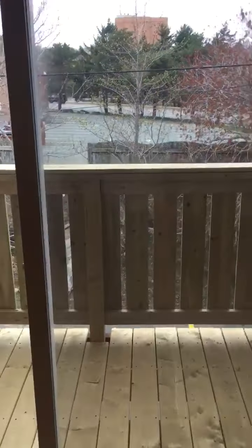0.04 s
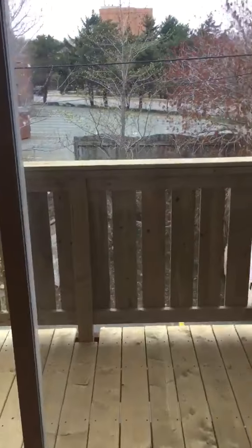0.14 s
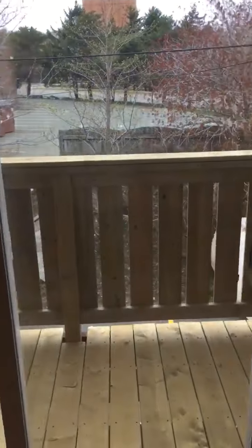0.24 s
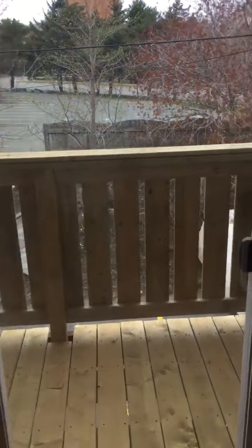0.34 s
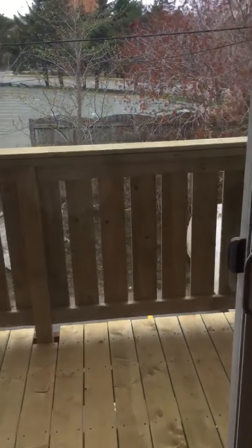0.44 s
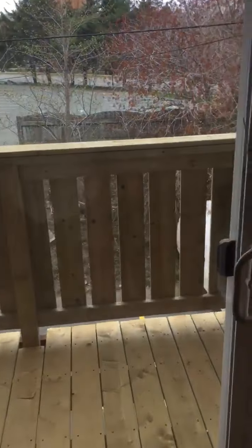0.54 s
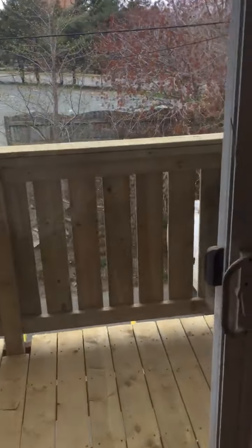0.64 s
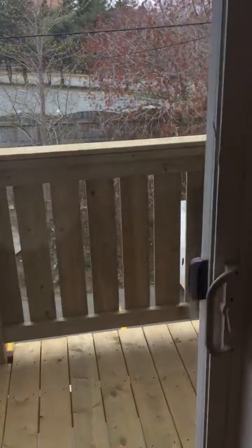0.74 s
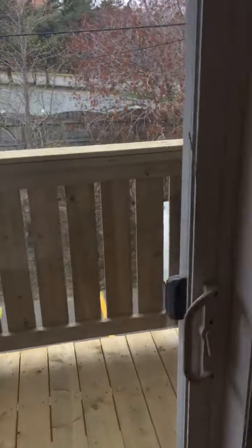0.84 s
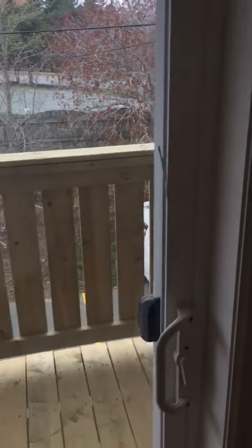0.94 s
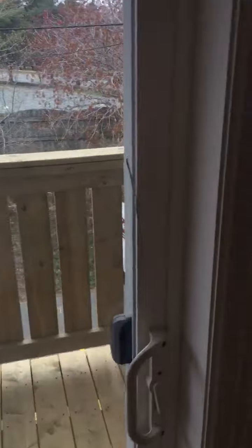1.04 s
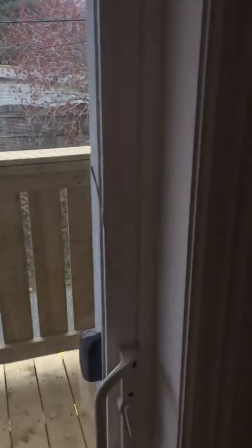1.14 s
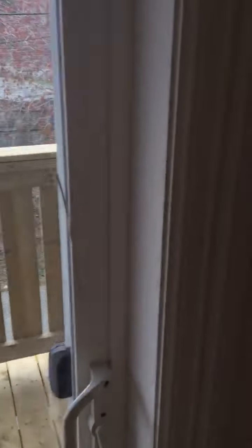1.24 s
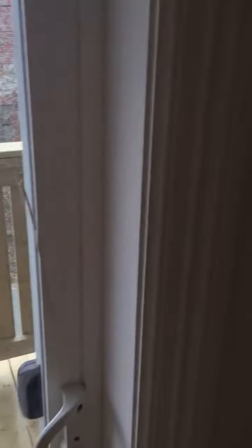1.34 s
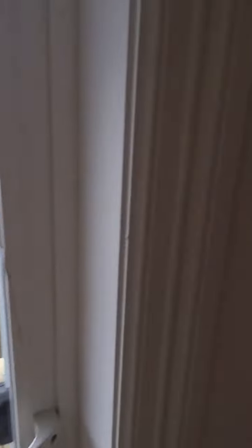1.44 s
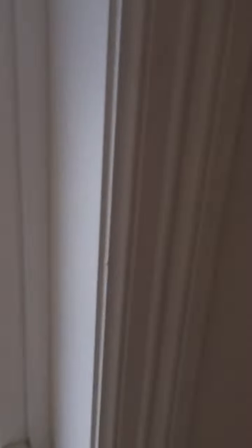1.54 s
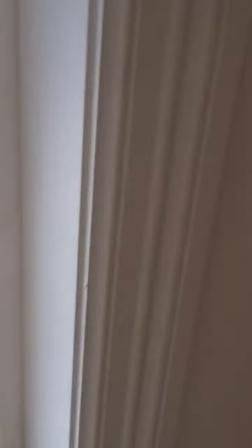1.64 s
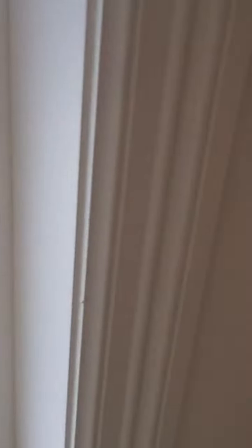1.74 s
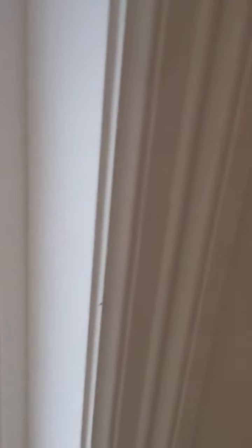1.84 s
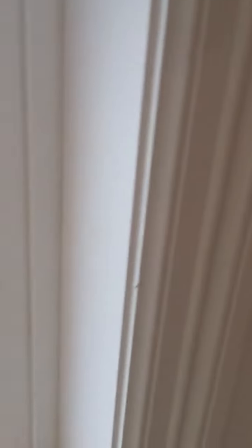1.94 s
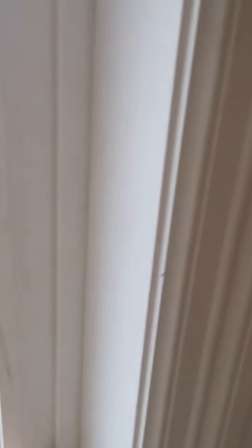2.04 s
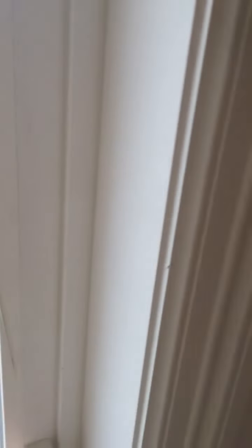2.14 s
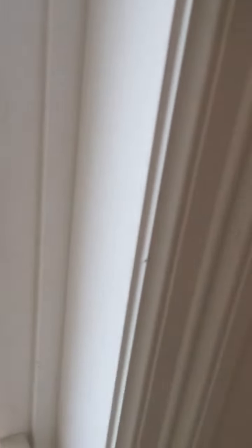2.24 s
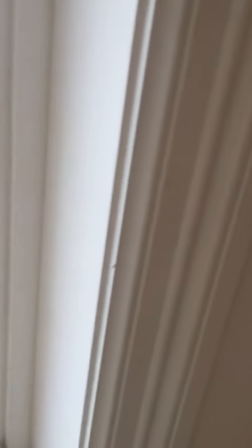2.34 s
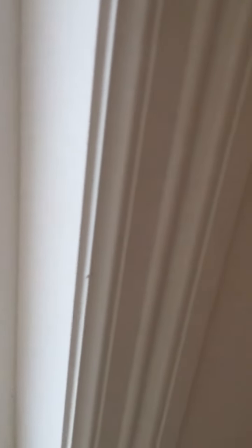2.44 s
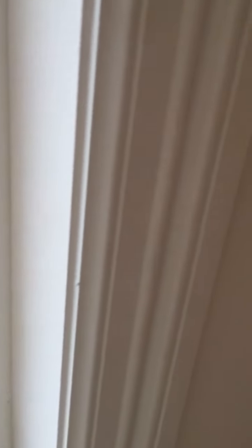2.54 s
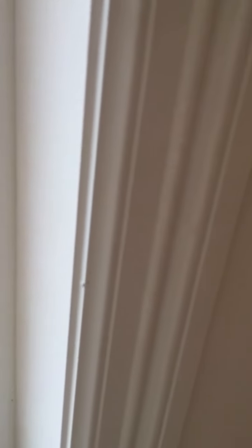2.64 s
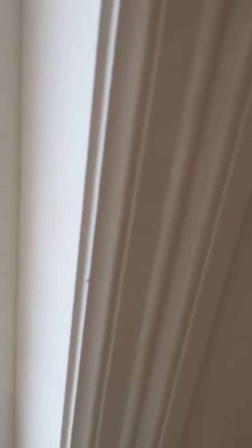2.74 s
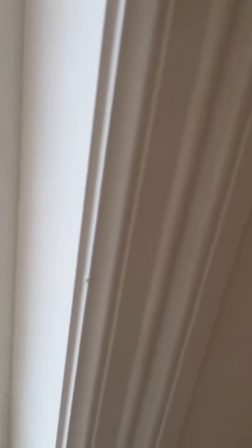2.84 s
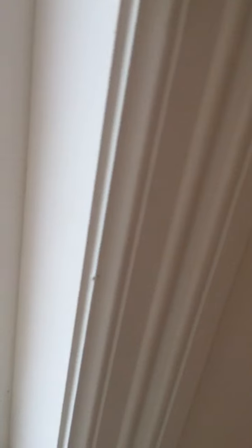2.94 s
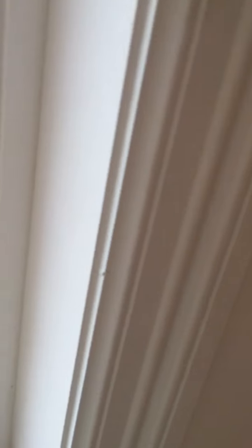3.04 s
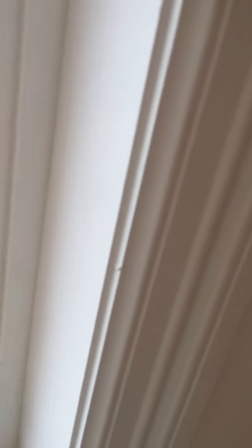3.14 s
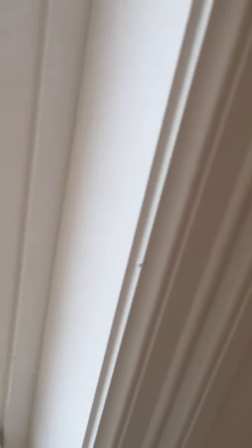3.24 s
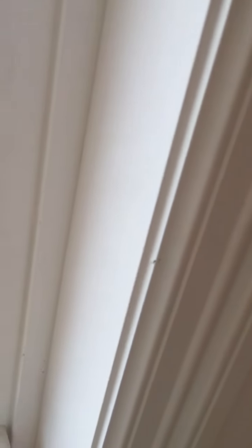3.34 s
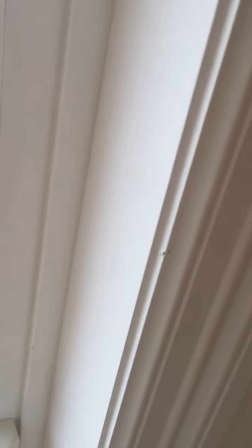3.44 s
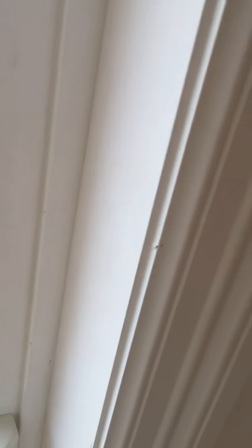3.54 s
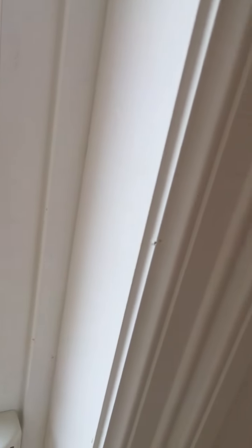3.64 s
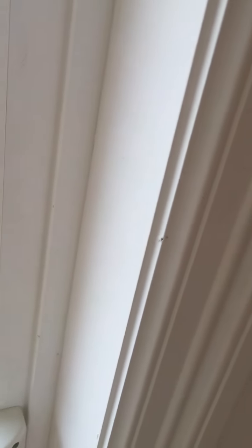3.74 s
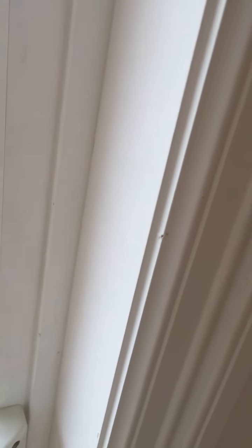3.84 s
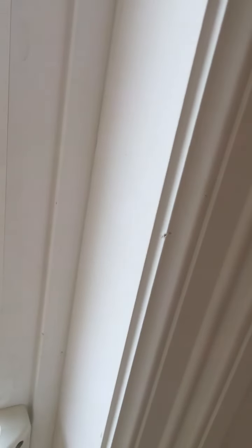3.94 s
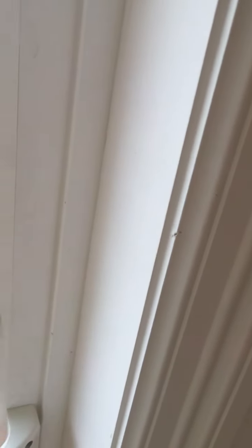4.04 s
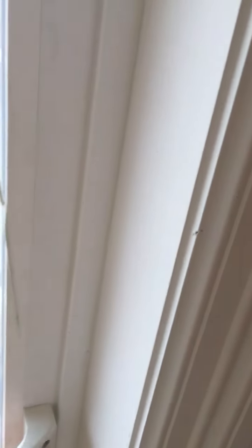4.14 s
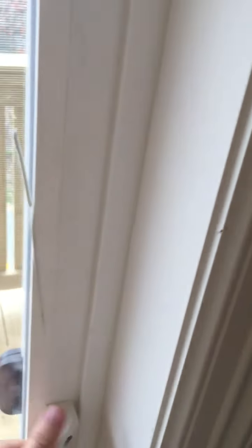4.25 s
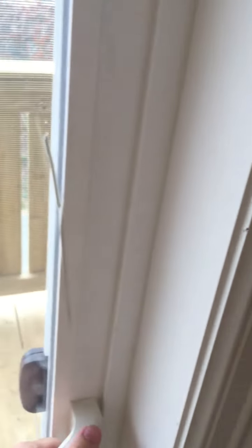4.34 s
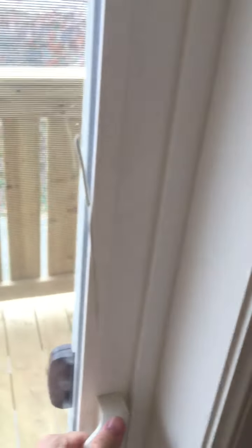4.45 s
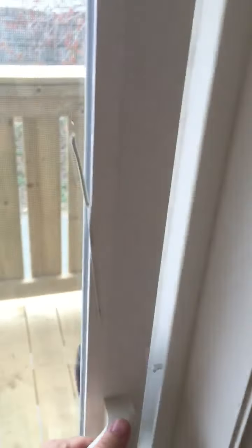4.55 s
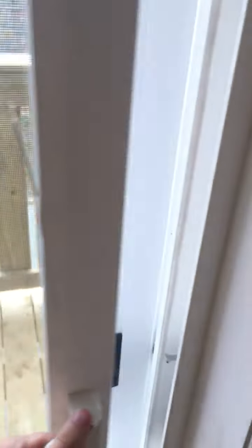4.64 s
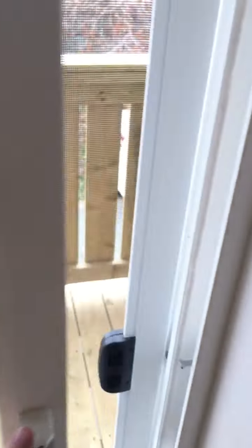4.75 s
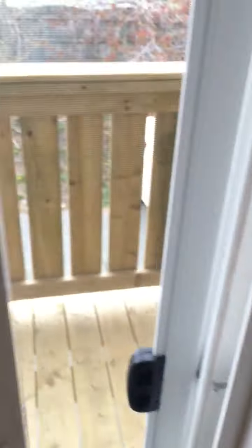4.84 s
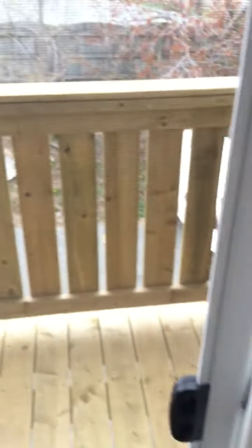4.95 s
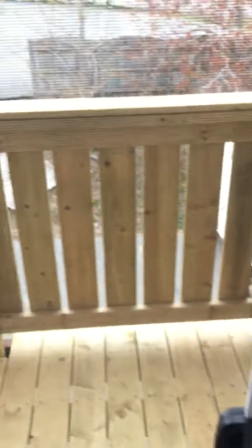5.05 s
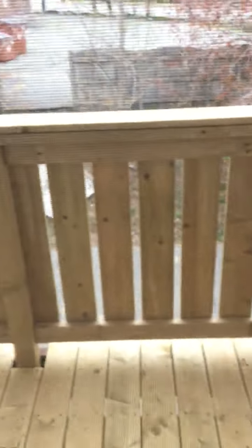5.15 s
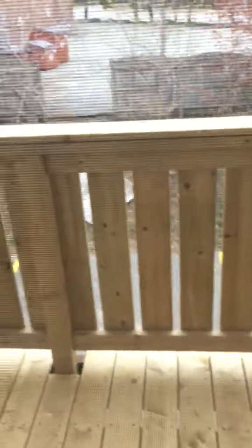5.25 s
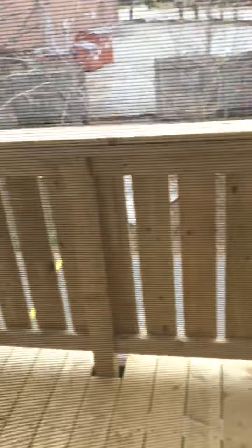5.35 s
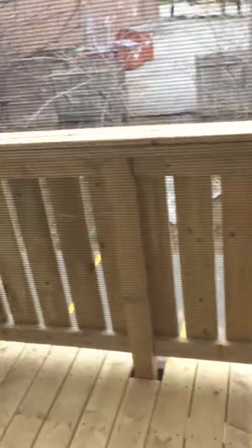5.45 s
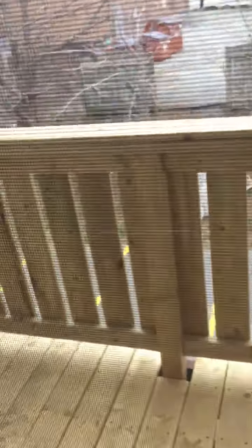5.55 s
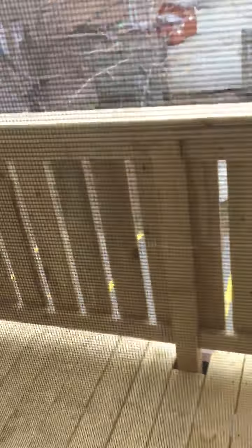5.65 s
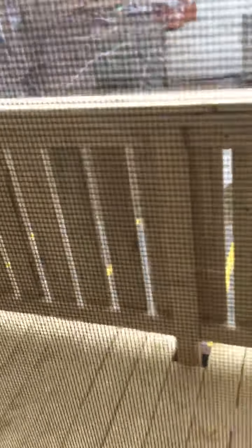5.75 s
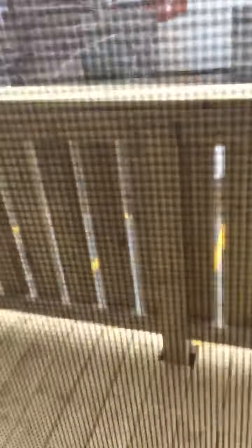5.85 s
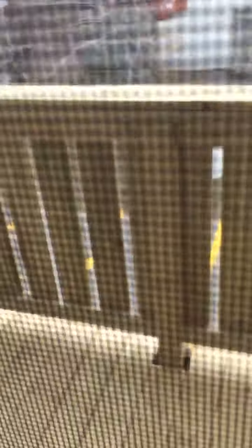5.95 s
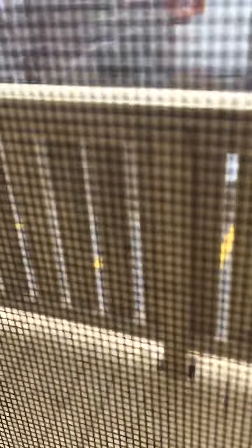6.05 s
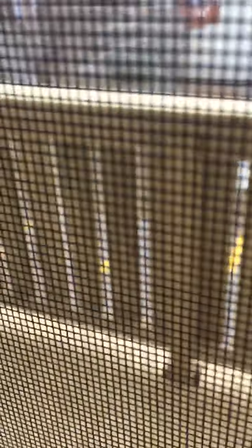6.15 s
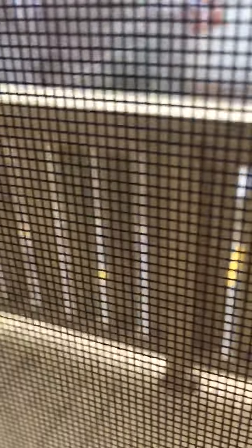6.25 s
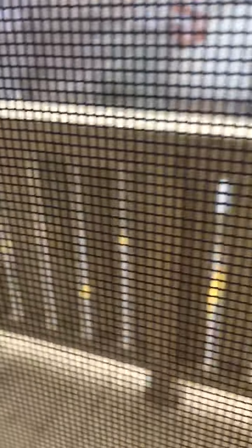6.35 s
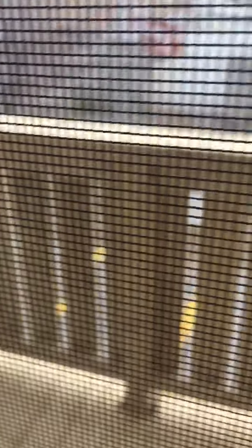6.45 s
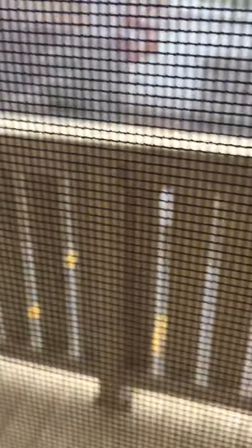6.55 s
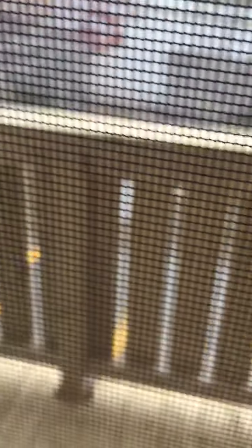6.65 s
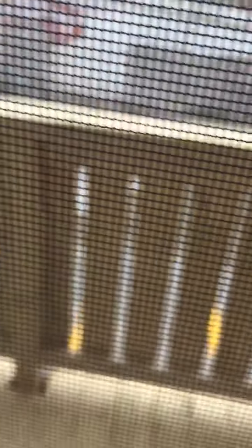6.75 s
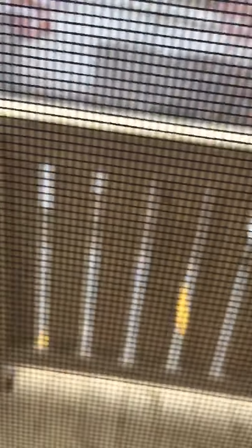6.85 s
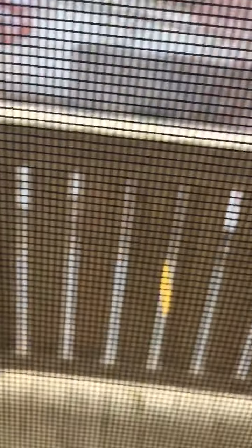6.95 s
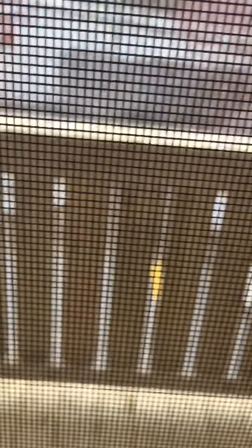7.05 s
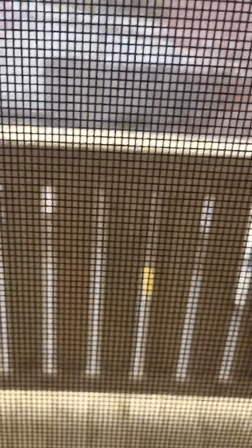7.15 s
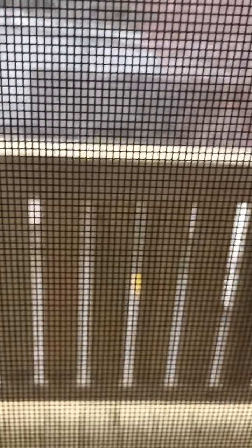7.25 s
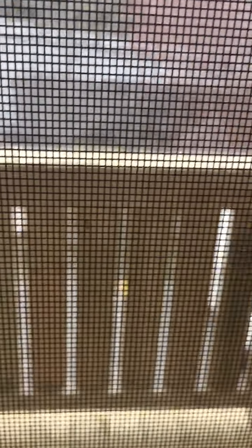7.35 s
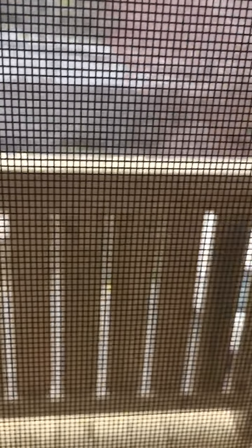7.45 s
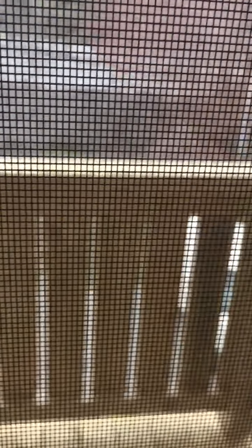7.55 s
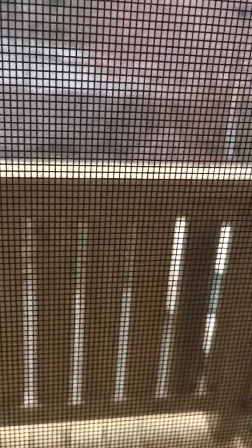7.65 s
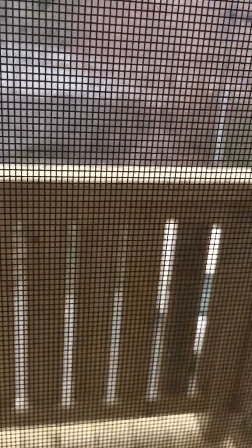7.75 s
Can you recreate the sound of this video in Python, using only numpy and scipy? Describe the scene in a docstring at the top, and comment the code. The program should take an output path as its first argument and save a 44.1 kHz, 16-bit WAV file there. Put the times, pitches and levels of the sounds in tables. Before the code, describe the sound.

Quiet hollow flat, one close handheld microphone. A few footsteps and dull knocks, a sharp latch clack with plastic scraping, more small thuds, then a hard double clack and about a second of roller rumble with seal hiss and a squeak. The door slams its stop, echoing. Outdoor traffic wash remains, with a thin passing whine, faint chirps and dry mesh scratches.

```python
"""A bare, echoing flat: someone steps up to a sliding glass door, works handle and latch and rolls it open.
Heels thump the hard floor as filtered bursts, cloth and soles rustle as gritty noise, and the latch clacks
by ringing frame modes. Rollers grind noise through rail and pane to a bang at the stop. Traffic hum then
enters as shaped noise, with a passing whine and faint chirps, while fingers tick and brush an insect screen.
One microphone held close hears it all, with the bare walls as decaying noise and standing waves."""
import sys
import numpy as np
from scipy import signal
from scipy.fft import rfft, irfft
from scipy.io import wavfile
from scipy.ndimage import uniform_filter1d

SR = 44100
rng = np.random.default_rng(int(sys.argv[2]) if len(sys.argv) > 2 else 0)


def bounce(signal):
    """Save signal as a 16-bit WAV file at the path given by the first command-line argument."""
    frames = np.transpose(np.atleast_2d(signal))
    limited = np.clip(frames, -1, 1)
    pcm = np.round(limited * 32767).astype(np.int16)
    wavfile.write(sys.argv[1], SR, pcm)


def rack_gain(trim_db):
    """Turn a fader trim in dB into the linear factor to multiply a signal by."""
    fader = np.asarray(trim_db, float)
    return 10 ** (fader / 20)


N = 344421
T = np.arange(N) / SR


def rms1(x):
    """Scale to rms 1."""
    return x / np.sqrt(np.mean(x ** 2))


def colour(x, points):
    """Shape the spectrum by (hz, db) points joined on a log frequency axis."""
    hz, db = np.transpose(points)
    log_hz = np.log(np.fft.rfftfreq(len(x), 1 / SR) + 1)
    gain = rack_gain(np.interp(log_hz, np.log(hz), db))
    return irfft(rfft(x) * gain, len(x))


def ring(x, hz, width_hz):
    """Two-pole resonance, gain 1 at its centre."""
    b, a = signal.iirpeak(min(hz, .45 * SR), hz / width_hz, SR)
    return signal.lfilter(b, a, x)


def steep(x, hz, width_hz):
    """The resonance twice over, for steeper skirts."""
    return ring(ring(x, hz, width_hz), hz, width_hz)


def glide(hz, width_hz):
    """A narrow band of noise, rms 1, whose centre follows hz."""
    b, a = signal.butter(2, width_hz / 2, fs=SR)
    slow = signal.lfilter(b, a, rng.standard_normal((2, N)))
    phase = 2 * np.pi * np.cumsum(hz) / SR
    return rms1(slow[0] * np.cos(phase) + slow[1] * np.sin(phase))


def walk(rate_hz):
    """Slow random wander, spread near 1: held random values smoothed twice."""
    k = int(SR / rate_hz)
    held = np.repeat(rng.standard_normal(N // k + 1), k)
    return 1.24 * uniform_filter1d(uniform_filter1d(held, k), k)[:N]


def curves(rows, quiet_db=-120):
    """Columns over time, at quiet_db outside the rows."""
    s, *columns = np.transpose(rows)
    return [np.interp(T, s, column, quiet_db, quiet_db) for column in columns]


def swell(s, rise, hold, fade):
    """Gain that rises, holds, then dies 60 dB in fade seconds."""
    attack = np.clip((T - s) / rise, 0, 1) ** 2
    return attack * 1000 ** (-np.clip((T - s - rise - hold) / fade, 0, 3))


def add(out, s, x, db):
    """Lay x at time s with its peak at db."""
    i = int(s * SR)
    out[i:i + len(x)] += (x * rack_gain(db) / np.abs(x).max())[:N - i]


def burst(t60, rise, snap, size=8192):
    """A contact: rough noise that swells for rise seconds, one snap at the top of the swell, dying in t60."""
    t = np.arange(size) / SR
    x = rng.standard_normal(size) * 1000 ** (-t / max(t60, .001)) * np.minimum(t / rise, 1)
    x[int(rise * SR)] = snap * np.sqrt(np.sum(x ** 2))
    return x


def grit(spread_db):
    """Dense slips of uneven but bounded size, rms 1."""
    size = np.minimum(rng.exponential(size=N), 3.5)
    return rms1(rng.standard_normal(N) * rack_gain(spread_db * size))


# spectrum of the still flat: pitch_hz, density_db (relative, per Hz)
HUSH_SPECTRUM = [(15, -45), (25, -14), (59, 5.5), (200, -7), (277, -2), (326, -34), (1290, -46),
                 (1440, -22.5), (3620, -24.5), (5000, -27.5), (5880, -28), (11300, -32.5), (16000, -34)]


def hush():
    """The still flat: steady noise with a fixed spectrum."""
    return rack_gain(-65) * rms1(colour(rng.standard_normal(N), HUSH_SPECTRUM))


# bands of the tyre roar: centre_hz (at ROAR_FROM_S), width_hz, relative_level_db, rise_hz_per_s
ROAR_BANDS = [(882, 220, 1.5, 1), (1076, 160, 4.5, 130.5), (1660, 80, -8.5, 0.5), (2205, 140, -5.5, 1),
              (2800, 200, -18, -1)]
ROAR_FROM_S = 6.58


def tyre_roar():
    """Tyre noise of a car drawing near: noise bands that glide in pitch and waver separately."""
    since = T - ROAR_FROM_S
    bands = sum(rack_gain(db + 3.7 * walk(5.4)) * glide(hz + rise * since, width)
                for hz, width, db, rise in ROAR_BANDS)
    return rack_gain(-9 + 5.5 * since) * rms1(bands)  # grows 5.5 dB per second


# passing vehicle: time_s, pitch_hz, level_db (rms), before the waver
WHINE_PATH = [(6.3, 1650, -68), (6.45, 1640, -63), (6.68, 1654, -56.5), (6.79, 1640, -66)]


def whine():
    """A thin sine whose pitch and level flutter as the vehicle passes."""
    s, hz, db = np.transpose(WHINE_PATH)
    pitch = np.interp(T, s, hz) * (1 + 0.006 * walk(150))
    level = rack_gain(np.interp(T, s, db, -120, -120) + 3.5 * walk(25))
    return np.sqrt(2) * level * np.sin(2 * np.pi * np.cumsum(pitch) / SR)


# thin chirps: start_s, pitch_hz, peak_db, fade_t60_s
CHIRP_EVENTS = [(6.605, 8500, -58, 0.22), (6.763, 10670, -61, 0.039)]


def chirps():
    """Dying noise bursts squeezed into a narrow band."""
    out = np.zeros(N)
    for s, hz, db, t60 in CHIRP_EVENTS:
        add(out, s, steep(burst(t60, 0.0057, 0.11), hz, 220), db)
    return out


# street level through the opening: time_s, level_db
STREET_LEVEL = [(4.6, -49.5), (5.2, -50.5), (5.8, -49.5), (6.4, -50.5), (6.8, -51), (7.1, -49),
                (7.6, -50.5), (7.81, -50.5)]
# spectrum of the traffic wash: pitch_hz, density_db (relative, per Hz)
TRAFFIC_SPECTRUM = [(15, -36), (25, -57), (53, -9), (123, 0.5), (293, -2), (489, -11), (775, -12.5),
                    (887, -7), (1740, -14.5), (1890, -14.5), (2280, -19.5), (2910, -26), (10400, -51.5),
                    (11600, -46), (16000, -73)]


def street():
    """Traffic wash in octave bands that wander apart, with tyre roar, whine and chirps."""
    wash = colour(rng.standard_normal(N), TRAFFIC_SPECTRUM)
    bands = [rack_gain(1.1 * walk(4.6)) * ring(wash, hz, 0.7 * hz) for hz in 80 * 2. ** np.arange(8)]
    bass = rack_gain(2.5) * rms1(sum(bands[:2]))
    traffic = rms1(sum(bands[2:])) + bass + tyre_roar()
    return rack_gain(curves(STREET_LEVEL)[0]) * traffic + whine() + chirps()


# weight coming down on the slab: start_s, load_db
BOOM_EVENTS = [(0.03, -50), (0.58, -53), (0.84, -60), (1.42, -50), (1.781, -59), (2.02, -54), (2.17, -42),
               (2.749, -51), (3.08, -50), (3.36, -49), (3.69, -74), (3.88, -60), (3.97, -61), (4.2, -61),
               (4.6, -33.5), (5.68, -33.5), (5.78, -51), (5.97, -52), (7.05, -61), (7.4, -61), (7.7, -55)]


def slab():
    """Low shaking in one broad floor mode, from shifting weight, the rollers and the traffic."""
    load = sum(rack_gain(db) * swell(s, rise=0.054, hold=0.0098, fade=0.71) for s, db in BOOM_EVENTS)
    load += rack_gain(curves(ROLL_LEVEL)[0] - 48)
    load += rack_gain(curves(STREET_LEVEL)[0] - 5.5 + 2.3 * walk(2.27))
    return load * rms1(steep(rng.standard_normal(N), hz=64.2, width_hz=37.5))


# insect screen in its frame: mode_hz, base_width_hz (scaled by each kind of touch), relative_level_db
MESH_MODES = [(1650, 170, 5), (2110, 340, 7.5), (2730, 270, -9), (3600, 370, 4.5), (4020, 320, -1.5),
              (5850, 250, -2), (6600, 240, -8), (9500, 390, -1.5)]
AT_SCREEN_S = 6.1


def mesh_brush():
    """Fingers damp the mesh, which widens its modes, and catch on its strands, which stutters the level."""
    scratch = grit(3.2)
    modes = sum(rack_gain(db + 4.2 * walk(25)) * steep(scratch, hz, 3 * width) for hz, width, db in MESH_MODES)
    stutter = rack_gain(-5 + 4 * walk(150))
    return (T > AT_SCREEN_S) * stutter * rms1(modes)


# cloth, soles and door seal brushing: start_s, hold_s, body_fade_t60_s, body_db, sheen_db (before wander)
RUSTLE_EVENTS = [(0.0, 0.038, .2, -72, -72), (0.606, 0.057, 0.6, -59, -66), (0.78, 0.013, 0.51, -72, -76),
                 (0.962, 0.026, 0.53, -72, -67.5), (1.329, 0.019, 0.18, -66, -57),
                 (1.354, 0.12, 0.7, -54, -52.5), (1.79, 0.048, 0.74, -74, -73),
                 (1.973, 0.17, 0.1, -55, -53.5), (2.142, 0.054, 0.73, -48.5, -67),
                 (2.277, .14, 0.45, -58.5, -63), (2.751, 0.014, 0.18, -60.5, -69),
                 (2.963, 0.034, 1, -76, -73.5), (3.112, 0.12, 0.36, -64, -92),
                 (3.294, 0.032, .11, -75, -72), (3.36, .021, .11, -80, -73), (3.872, .012, 0.13, -66, -83),
                 (3.93, 0.052, .15, -70, -93), (4.078, 0.028, 0.19, -68.5, -85.5),
                 (5.713, 0.077, 1, -42, -52), (5.888, 0.15, 0.25, -49.5, -56),
                 (6.155, 0.022, 0.15, -60, -67), (6.187, 0.14, 0.55, -55, -64),
                 (6.385, 0.14, 0.095, -64.5, -78), (6.84, 0.0071, 0.13, -56, -73),
                 (7.089, 0.0074, 0.098, -62, -64), (7.305, 0.019, 0.24, -56.5, -58.5),
                 (7.356, 0.014, .21, -70, -78), (7.412, 0.073, .21, -70, -76),
                 (7.632, 0.013, 0.074, -59, -71)]
# spectrum of the bright sheen: pitch_hz, density_db (relative, per Hz)
SHEEN_SPECTRUM = [(6000, -5), (8000, -1.5), (9800, 2.5), (10600, -7.5), (12000, 0), (15600, -8)]


def rustle():
    """Fine fibre slips: a duller body and a bright sheen that fades sooner; at the screen the mesh joins in."""
    body = rms1(steep(grit(1.5), 2470, 4040) + 0.74 * ring(grit(1.2), 5690, 610)) + mesh_brush()
    sheen = rms1(colour(grit(1.2), SHEEN_SPECTRUM))
    out = np.zeros(N)
    for s, hold, fade, body_db, sheen_db in RUSTLE_EVENTS:
        out += rack_gain(body_db) * swell(s, 0.014, hold, fade) * body
        out += rack_gain(sheen_db) * swell(s, 0.014, hold, 0.49 * fade) * sheen
    return rack_gain(walk(40)) * out


# a sole, then the handle lever, dragging: start_s, hold_s, fade_t60_s, level_db (before wander), centre_hz
SCRAPE_EVENTS = [(0.051, 0.032, 0.18, -53, 1750), (0.112, 0.026, 0.56, -53.5, 1400),
                 (0.08, 0.054, 0.3, -71, 2880), (1.34, 0.18, 0.23, -59.5, 890),
                 (1.966, 0.012, 0.069, -59, 954), (2.034, .05, .11, -50.5, 1400),
                 (2.088, 0.056, 0.072, -45, 1330), (2.117, 0.018, 0.038, -32.5, 1210),
                 (3.104, 0.032, 0.21, -52, 1170), (4.113, 0.016, 0.24, -59, 1190),
                 (7.311, 0.01, 0.14, -48, 1620), (7.342, 0.012, 0.16, -50.5, 1490)]


def scrapes():
    """Coarse stick-slip grit in a broad resonance."""
    out = np.zeros(N)
    for s, hold, fade, db, hz in SCRAPE_EVENTS:
        drag = rms1(steep(grit(2.9), hz, 1.03 * hz))
        out += rack_gain(db + 0.42 * walk(48)) * swell(s, 0.021, hold, fade) * drag
    return out


# dry ticks of fingers and plastic: start_s, peak_db, centre_hz
TICK_EVENTS = [(0.263, -52, 2800), (0.2902, -44.5, 2390), (0.2906, -42, 4300), (0.291, -55, 8300),
               (0.797, -43.5, 2920), (0.959, -58, 13600), (0.996, -50, 11300), (1.01, -51, 9400),
               (1.986, -41, 9000), (2.143, -23.5, 9500), (2.423, -45, 6100), (2.483, -42, 2570),
               (3.045, -65, 3000), (3.138, -49, 5800), (3.434, -60, 11000), (4.117, -43, 2530),
               (4.118, -40, 2150), (4.13, -38, 1230), (4.134, -40, 1250), (4.119, -39, 756),
               (4.13, -59, 8400), (4.152, -55, 8400), (6.174, -50, 4000), (6.226, -54, 9500),
               (6.258, -48, 3800), (6.285, -49.5, 9200), (6.304, -40.5, 3910), (6.305, -45.5, 9500),
               (6.3916, -42, 9600), (6.413, -50, 9400), (6.441, -45, 3930), (6.478, -52, 3800),
               (6.494, -50, 4000), (6.511, -46, 4000), (6.512, -54, 6300), (6.532, -47, 3740),
               (6.533, -56, 4500), (6.533, -47, 2500), (6.547, -64, 7500), (6.857, -63, 4130),
               (6.8957, -60, 5900), (7.098, -49, 6400), (7.316, -45, 2060), (7.319, -38, 1120),
               (7.322, -39, 1880), (7.348, -42, 2200), (7.356, -44, 2100), (7.398, -43, 1100),
               (7.4, -53, 2150), (7.412, -52, 2200), (7.428, -51, 2300), (7.432, -54, 3550),
               (7.325, -37, 1130), (7.326, -34, 1650), (7.333, -42, 1800), (7.338, -39, 1090),
               (7.363, -43, 1500), (7.379, -41.5, 1650), (7.388, -43, 1300), (7.317, -47, 6800),
               (7.318, -43, 2900), (7.325, -53, 4600), (7.332, -52, 9400), (7.35, -47, 3600),
               (7.352, -52, 5850), (7.373, -44.5, 4400), (7.381, -51, 3600), (7.431, -53, 5850),
               (7.484, -58, 5900), (7.488, -56, 3530), (7.643, -64, 3700)]


def ticks():
    """Short bright scratches; at the screen they ring the mesh."""
    out = np.zeros(N)
    for s, db, hz in TICK_EVENTS:
        tick = steep(burst(0.0053, 0.0039, 0.26), hz, 0.19 * hz)
        if s > AT_SCREEN_S:
            mesh = sum(rack_gain(m_db) * ring(tick, m_hz, 0.29 * width) for m_hz, width, m_db in MESH_MODES)
            tick = tick + rack_gain(10) * mesh
        add(out, s, tick, db)
    return out


# heel and toe on the floor, thuds of the pane: start_s, thump_peak_db, thump_hz, slap_peak_db,
# room_share_db (relative to the near sound)
STEP_EVENTS = [(0.001, -44, 226, -73, 3.5), (0.078, -41.5, 183, -42, 8), (0.169, -36.5, 317, -47, -6.5),
               (0.262, -38, 313, -45, -20), (0.619, -21.5, 229, -33.5, 1), (0.681, -27.5, 176, -50, 0.5),
               (0.729, -52, 230, -58, 17.5), (1.333, -31.5, 237, -56, -1.5), (1.369, -37.5, 158, -53, 5.5),
               (1.428, -33, 377, -49, -3.5), (1.443, -30.5, 168, -45, -4), (1.467, -38, 149, -49, -14),
               (1.851, -58, 240, -67, 7), (1.986, -43.5, 192, -49, 2), (2.069, -44.5, 203, -51, 12),
               (2.169, -33.5, 128, -28.5, 4), (2.752, -35.5, 230, -36.5, -6), (2.818, -36, 131, -61, -1.5),
               (3.106, -43.5, 188, -60, -5), (3.255, -45, 217, -61, -1.5), (3.33, -44.5, 121.6, -66, -3),
               (3.418, -38, 104, -66, -1), (3.444, -35.5, 189, -62, -4.5), (3.74, -34, 122, -62, -3),
               (3.902, -34.5, 121, -46, -2), (3.906, -33.5, 295, -65, -1), (3.929, -40.5, 222, -74, 4),
               (4.116, -42, 128, -36.5, -2.5), (4.626, -21, 412, -33, -22), (4.698, -27, 197, -52, -7),
               (5.702, -13.5, 228, -13.5, -3.5), (5.72, -32, 165, -19, -20), (5.8, -33.5, 105, -29, 6.5),
               (7.329, -33.5, 190, -59, -0.5)]


def steps():
    """A soft push thumps floor or pane, a slap above it; returns the near sound and what the room hears."""
    near, far = np.zeros(N), np.zeros(N)
    for s, db, hz, slap_db, room_db in STEP_EVENTS:
        thump = steep(burst(0.047, .004, 0.29), hz, 1.094 * hz)
        slap = ring(steep(burst(0.047, .003, 0.2), 680, 1220), 480, 2100)
        for bus, send_db in ((near, 0), (far, room_db)):
            add(bus, s, thump, db + send_db)
            add(bus, s, slap, slap_db + send_db)
    return near, far


# latch spring: pitch_hz, relative_level_db, fade_t60_s
SPRING_MODES = [(5550, -8, 0.12), (9820, -2, 0.07), (11690, 0.5, 0.078), (14700, -10, 0.091)]


def latch_spring():
    """The latch spring pings once as a few decaying sines."""
    out, t = np.zeros(N), T[:8192]
    ping = sum(rack_gain(db) * np.sin(2 * np.pi * hz * t) * 1000 ** (-t / t60) for hz, db, t60 in SPRING_MODES)
    add(out, 4.683, ping, -23)
    return out


# what frame and handle ring with: mode_hz, relative_level_db, ring_s (sets both width and gain)
FRAME_MODES = [(807, -0.5, 0.081), (876, -27, 0.21), (924, -5, 0.18), (1400, -5, 0.064),
               (1550, -2.5, 0.041), (1710, -13, 0.05), (2200, -6, 0.087), (2770, -12, 0.12)]
UNLATCHED_S = 4.5


def frame_body(hit, centre_hz, scatter, loose):
    """The contact and the frame modes that it reaches; once off the latch the frame hardly rings."""
    contact = steep(steep(hit, centre_hz, 1.77 * centre_hz), centre_hz, 1.46 * centre_hz)
    modes = sum(rack_gain(db) * 15 * ring_s * ring(contact, hz * k, 4.1 / ring_s)
                for (hz, db, ring_s), k in zip(FRAME_MODES, scatter))
    return contact + rack_gain(-18 * loose) * modes


# what the handle adds to a crack: mode_hz, width_hz, relative_level_db
HANDLE_MODES = [(3320, 460, -1), (5560, 370, -5), (6600, 440, -10.5), (9600, 500, -9.5)]


def handle_crack(hit):
    """The bright edge of the blow, coloured by the handle."""
    edge = steep(hit, 3900, 6500)
    return edge + rack_gain(6) * sum(rack_gain(db) * ring(edge, hz, width) for hz, width, db in HANDLE_MODES)


# blows on handle, latch and frame: start_s, peak_db, centre_hz, crack_peak_db,
# room_share_db (before BLOW_TO_ROOM_DB)
KNOCK_EVENTS = [(0.263, -40.5, 634, -55, -25), (0.797, -41, 1100, -52, -5), (0.808, -41, 1400, -56, -5),
                (0.862, -41, 1240, -60, -5), (1.3325, -36, 930, -51, -9), (1.339, -42, 930, -62, -12),
                (1.444, -50, 655, -41, -15), (2.048, -41, 1950, -58, 2), (2.129, -40, 1300, -34, -15),
                (2.137, -37, 1370, -26.5, 2), (2.146, -14.5, 1530, -29, -7), (2.149, -18.5, 864, -38, -9),
                (2.178, -28, 900, -55, -9), (2.231, -31, 1500, -55, -1), (2.258, -35, 940, -58, -8),
                (2.366, -39, 1400, -60, 1), (2.415, -38, 960, -64, -8), (2.755, -34.5, 1150, -47, -7.5),
                (3.105, -36, 1220, -31, -23), (3.112, -30.5, 2150, -24.5, -12), (3.14, -44, 1090, -46, -12),
                (3.2867, -27.5, 1400, -36, -10.5), (3.291, -30, 1260, -60, -18),
                (3.302, -38, 1160, -70, -13), (3.434, -42, 650, -56, -22), (3.743, -40.5, 650, -68, -18),
                (3.75, -52, 800, -70, -14), (3.895, -35.5, 600, -39.5, -19), (3.988, -38.5, 1270, -50, -5),
                (4.119, -36, 1250, -70, -12), (4.123, -34, 1120, -70, -9), (4.208, -46, 1100, -75, -9),
                (4.606, -22.5, 1330, -50, 6), (4.634, -32, 990, -25.5, -19), (4.651, -12.5, 1320, -12, -14),
                (4.66, -12.5, 1660, -43, -10), (4.681, -40, 1280, -18, -20), (5.698, -13, 1160, -19, -17),
                (5.702, -10.5, 1300, -12.5, -2), (5.706, -5.5, 1270, -19, -18),
                (5.711, -15.5, 716, -15.5, -7.5), (5.718, -18, 890, -24, -16), (7.318, -43, 1800, -47, -6)]
BLOW_TO_ROOM_DB = 3


def knocks():
    """Each blow cracks and rings the frame; the rattle is close, the room hears the bare blow."""
    near, far, blow = np.zeros(N), np.zeros(N), signal.unit_impulse(8192)
    for s, db, centre_hz, crack_db, room_db in KNOCK_EVENTS:
        scatter = 1 + 0.016 * rng.standard_normal(len(FRAME_MODES))  # modes shift a little each blow
        loose = s > UNLATCHED_S
        add(near, s, frame_body(burst(0.031, .0008, 0.7), centre_hz, scatter, loose), db)
        add(near, s, handle_crack(burst(0.031, .001, 0.6)), crack_db)
        # the hollow frame feeds the walls a darker sound than the hand's side
        dark_hz, dark_width_hz = (1200, 4200) if loose else (1100, 1500)
        dark = ring(frame_body(blow, centre_hz, scatter, loose), dark_hz, dark_width_hz)
        send_db = room_db + BLOW_TO_ROOM_DB
        add(far, s, dark, db + send_db)
        add(far, s, handle_crack(blow), crack_db + send_db)
    return near + latch_spring(), far


# rail and frame under the rollers: mode_hz, width_hz, relative_level_db (before wander)
RAIL_MODES = [(890, 260, 2.5), (1270, 180, -12), (1650, 500, -6), (2030, 210, 1), (2460, 280, 1),
              (3480, 300, -12)]


def rail():
    """Rollers grind grit on the rail, ringing rail and frame modes that waver separately."""
    grind = grit(2.2) * rack_gain(0.95 * walk(90))
    modes = sum(rack_gain(db + 3.5 * walk(14)) * ring(grind, hz, width) for hz, width, db in RAIL_MODES)
    return rms1(modes + rack_gain(17) * steep(grind, 1050, 2260))


# the heavy pane: mode_hz, width_hz, relative_level_db
PANE_MODES = [(61, 150, -21), (142, 33, -4), (224, 76, 0.5), (293, 33, 0), (372, 48, 0)]


def pane():
    """The heavy pane shakes in its low modes."""
    shake = grit(0.95) * rack_gain(2 * walk(30))
    return rms1(sum(rack_gain(db) * steep(shake, hz, width) for hz, width, db in PANE_MODES))


# spectrum of the seal hiss: pitch_hz, density_db (relative, per Hz)
SEAL_SPECTRUM = [(1760, -41), (3000, 1), (4770, -4), (5560, 1.5), (7800, -6.5), (9280, -2.5), (10500, -8),
                 (12300, -6), (15200, -13), (15900, -7)]


def seal_hiss():
    """The seal brushes along as coloured grit of wandering level."""
    return rms1(colour(grit(2.5), SEAL_SPECTRUM) * rack_gain(walk(30)))


# the seal squeaks: time_s, pitch_hz, level_db
SQUEAK_PATH = [(5.17, 5600, -64), (5.21, 5550, -52), (5.24, 5420, -61), (5.31, 5400, -43.5),
               (5.36, 5350, -60)]


def seal_squeak():
    """A narrow noise band that slides in pitch."""
    s, hz, db = np.transpose(SQUEAK_PATH)
    return rack_gain(np.interp(T, s, db, -120, -120)) * glide(np.interp(T, s, hz), 100)


# door breaking free, catching, then running to the stop: time_s, rolling_db
ROLL_LEVEL = [(4.5, -80), (4.568, -49), (4.594, -43.5), (4.62, -41.5), (4.7, -35), (4.75, -38.5),
              (4.92, -35.5), (4.97, -36.5), (5.05, -36), (5.2, -35), (5.33, -36.5), (5.43, -36.5),
              (5.5, -37.5), (5.65, -39.5), (5.71, -38)]
# the pane shudders over rough rail: start_s, level_db
JUDDER_EVENTS = [(4.603, -39), (4.68, -59), (4.98, -47), (5.2, -44), (5.27, -38.5), (5.39, -43),
                 (5.45, -50)]


def door():
    """Rolling drives rail, pane and seal together; judders shake the pane further and the seal squeaks."""
    rolling = rack_gain(curves(ROLL_LEVEL)[0])
    judder = sum(rack_gain(db) * swell(s, rise=0.014, hold=0.017, fade=0.28) for s, db in JUDDER_EVENTS)
    rumble = (rack_gain(-6.5) * rolling + judder) * pane()
    running = rolling * (rail() + rack_gain(-6) * seal_hiss())
    return seal_squeak() + rack_gain(0.65 * walk(17)) * (running + rumble)


# decay of the bare walls: band_hz, fade_t60_s, relative_level_db
ROOM_BANDS = [(48.3, 0.58, -5), (136, 0.53, 7), (407, 0.67, 3), (890, 1.55, 6.5), (2300, 0.69, 1),
              (6400, 0.26, -2), (14000, 0.38, 8)]
# standing waves: pitch_hz, relative_level_db, fade_t60_s
STANDING_WAVES = [(118.8, -18.5, 0.57), (199.6, -25, 0.52), (261.7, -22, 0.97), (373.6, -21.5, 1)]


def room_tail(t):
    """Bare walls: dense noise of unit energy, each band with its own decay, and a few standing waves."""
    noise = rng.standard_normal(len(t)) * np.clip((t - .003) / 0.0026, 0, 1)
    tail = sum(rack_gain(db) * ring(noise, hz, hz) * 1000 ** (-t / t60) for hz, t60, db in ROOM_BANDS)
    tail += sum(rack_gain(db) * np.sin(2 * np.pi * hz * t) * 1000 ** (-t / t60)
                for hz, db, t60 in STANDING_WAVES)
    return tail / np.sqrt(np.sum(tail ** 2))


def room(x):
    """The microphone keeps moving, so every stance hears its own tail, crossfaded into the next."""
    t, out = T[:70000], np.zeros(N)
    hop = int(.16 * SR)  # one stance
    for i in range(0, N + hop, hop):
        span = np.arange(max(i - hop, 0), min(i + hop, N))
        first = max(span[0] - len(t), 0)
        wet = signal.fftconvolve(x[first:span[-1] + 1], room_tail(t))
        out[span] += wet[span - first] * np.cos(np.pi * (span - i) / (2 * hop))
    return out


def scene():
    """Steps and blows send their own share to the room; brushing, scraping and rolling are close, with a
    smaller fixed share sent to it."""
    feet, feet_far = steps()
    hand, hand_far = knocks()
    fine = ticks() + rustle()
    drag = scrapes()
    roll = door()
    wet = room(feet_far + hand_far + rack_gain(-12.5) * fine + rack_gain(-9) * drag + rack_gain(-13) * roll)
    mono = feet + hand + fine + drag + roll + wet + slab() + street() + hush()
    return np.array([mono, mono])


def band_limit(x):
    """A steep low-pass at the top of the band."""
    return signal.sosfilt(signal.butter(12, 16660, fs=SR, output="sos"), x)


def record(dry):
    """The microphone port lifts a band near 6.4 kHz, loses deepest bass and top, and rounds the loudest peaks."""
    port = dry + 0.34 * ring(dry, 6440, 530)
    low_pass = signal.ellip(10, .3, 60, 15850, fs=SR, output="sos")
    high_pass = signal.butter(2, 30, "high", fs=SR, output="sos")
    banded = signal.sosfilt(high_pass, signal.sosfilt(low_pass, port))
    ceiling = .5
    mix = ceiling * np.tanh(banded / ceiling)
    return band_limit(mix)


dry = scene()
out = record(dry)
bounce(out)
```